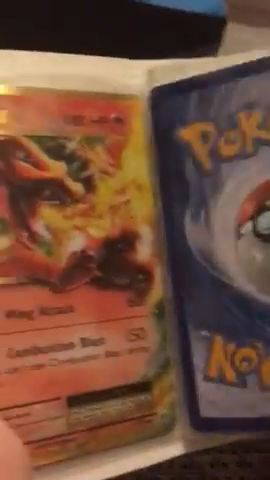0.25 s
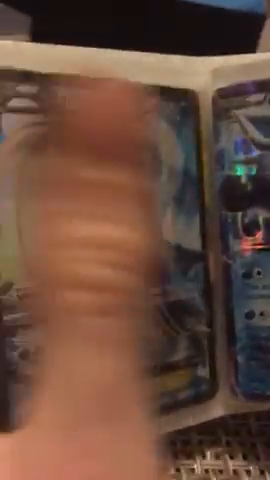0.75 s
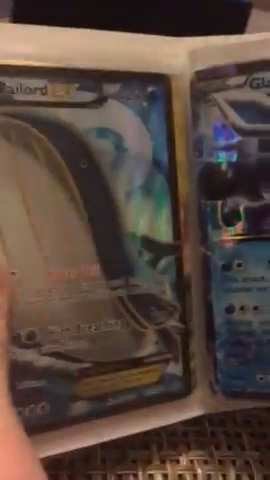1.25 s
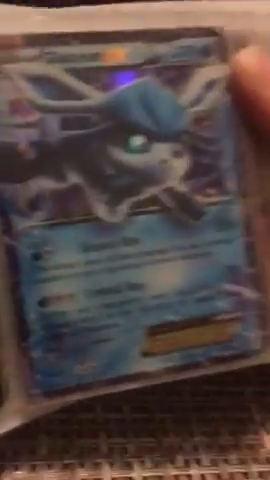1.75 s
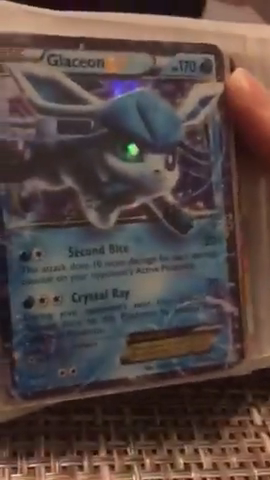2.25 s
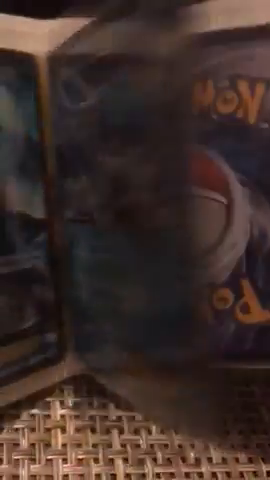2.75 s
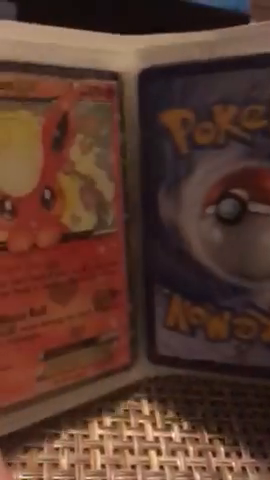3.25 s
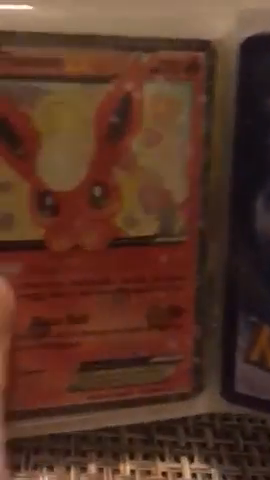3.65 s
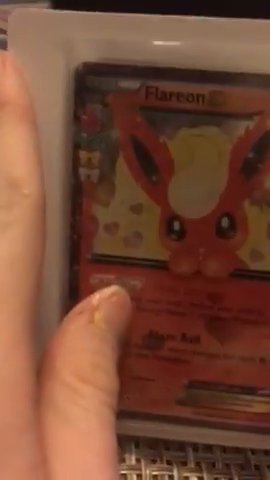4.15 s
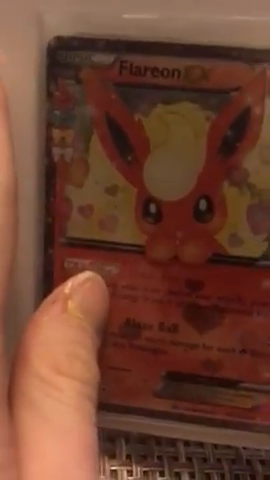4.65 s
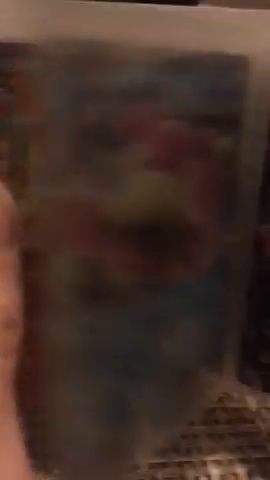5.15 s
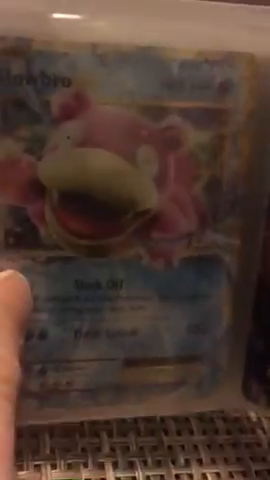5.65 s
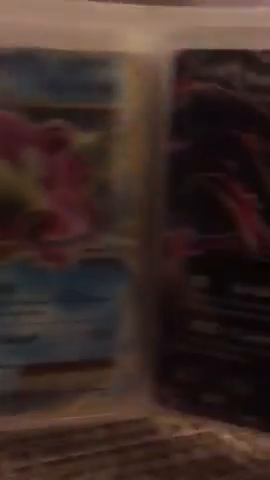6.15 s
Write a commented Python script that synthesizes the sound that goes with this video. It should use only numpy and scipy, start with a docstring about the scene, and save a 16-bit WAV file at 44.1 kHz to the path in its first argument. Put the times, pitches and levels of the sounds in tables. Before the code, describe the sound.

Sparse film clicks, grainy slides and soft swishes from stiff pocket pages being flipped in a quiet room, above a deep unsteady hum.

```python
"""In a quiet room, close by, plastic pocket pages full of trading cards are turned by hand in a binder.
Sleeves snap as they unstick: bursts of tiny slips set the film and the page ringing.
Pages slide, scuff and swish as shaped grainy noise; edges knock on the binder and ring its dull modes.
Under it a motor hums in steady tones, the hand-held microphone rumbles and deep booms swell briefly."""
import sys
import numpy as np
from scipy import signal
from scipy.fft import rfft, irfft, next_fast_len
from scipy.io import wavfile
from scipy.ndimage import map_coordinates

SR = 44100
rng = np.random.default_rng(int(sys.argv[2]) if len(sys.argv) > 2 else 0)


def to_wav(s):
    """Save 16-bit WAV."""
    ch = np.atleast_2d(s).T  # columns
    pcm = np.round(np.clip(ch, -1, 1) * 32767)  # PCM
    wavfile.write(sys.argv[1], SR, pcm.astype(np.int16))


N = 282769
TIME = np.arange(N) / SR   # s
CUTOFF_HZ = 17700

# A sleeve lets go: t/s, level/dB (rms over 5 ms), build-up/ms (0.05 or more is used), brightest f/Hz,
# width of the bright range/octaves, page body against film/dB, page body f/Hz
SNAPS = [(.0145, -69, .1, 9500, 1, -10, 1600), (0.2723, -57, .6, 6000, 1, -10, 1600),
         (0.2816, -32.5, 0.54, 6500, 0.81, -5.5, 1400), (.297, -63, .5, 7000, 1.3, -10, 1600),
         (.335, -68, .3, 9000, 1, -10, 1600), (0.556, -56, .3, 9520, 1.5, -9, 1600),
         (.567, -57, .5, 5000, 0.99, 13, 1800), (.593, -65, .1, 12500, 1, -10, 1600),
         (1.0482, -53, 0.09, 6000, 4.2, 10, 2300), (1.049, -52, .4, 4470, 1.2, 4, 2200),
         (1.505, -70, .3, 5500, 0.92, -2, 1800), (1.7586, -61, 0.26, 4480, 0.6, -2, 1600),
         (1.7945, -63, .17, 4470, 0.54, -4, 1600), (1.824, -70, .3, 5000, 1.3, 3, 1500),
         (1.851, -67, .2, 5500, 1.3, 2, 1600), (1.888, -59.5, .1, 4600, 1.2, 0, 1600),
         (1.93, -68, .2, 8000, 1, -5, 1600), (1.949, -62.5, .4, 7500, 0.93, 8, 1600),
         (2.178, -66.5, .46, 7000, 1.4, -5, 1600), (2.333, -68, .5, 8000, 0.9, -5, 1600),
         (2.4149, -46, .76, 10100, 1.2, -16, 2000), (2.419, -39.5, 2.3, 5400, 1.2, -10, 2200),
         (2.7051, -42.5, 0.061, 5770, 1.72, 12.5, 1400), (2.7233, -36.5, 0.031, 4630, 0.84, 1, 1570),
         (2.78, -69, .1, 11000, 1, -10, 1600), (2.868, -67, .1, 11500, 1, -10, 1600),
         (3.006, -56.5, 0.56, 5500, 1.1, 14, 1600), (3.242, -58.5, 0.27, 5240, 2, 8, 1800),
         (3.44, -66, .5, 8500, 1.14, -6, 1600), (4.0818, -60, 0.092, 3500, 0.6, 8, 1890),
         (4.8765, -49, 1.9, 9000, 1.1, -9, 2180), (4.8790, -34, 0.89, 8500, 1.15, -2, 2400),
         (4.886, -51.5, .2, 7900, 0.98, -7, 2000), (5.035, -71, 0.11, 12400, 1, -10, 1600),
         (5.048, -65, .1, 13000, 1, -10, 1600), (5.0529, -51.5, .1, 5230, 1.1, 3, 1600),
         (5.0605, -54, 0.18, 3800, 0.99, 22, 1500), (5.065, -64, 0.26, 4500, 1, 5, 1600),
         (5.084, -51, .12, 9000, 2.5, 8, 1400), (5.2905, -48.5, 0.11, 5896, 0.76, 1.5, 1500),
         (5.296, -53, .3, 5560, 2.5, 5, 1400), (5.302, -56, 0.24, 6000, 1.6, 4, 1600),
         (5.322, -66, .2, 8500, 1.3, -6, 1600), (5.488, -62, .4, 8500, 1.5, -3, 2200),
         (5.493, -55, .8, 4370, 1.2, -7, 2200), (5.874, -58.5, 0.4, 6000, 1.1, 5, 1800),
         (6.1489, -54, 0.13, 5510, 2.1, 12, 2100)]
# Card edges and fingers knock on the binder: t/s, level/dB (rms over 5 ms), strongest f/Hz
KNOCKS = [(1.7597, -54.5, 800), (1.7943, -53, 750), (1.888, -50, 900), (2.652, -40.5, 750),
          (2.725, -50.5, 600), (2.9852, -47, 700), (2.993, -47, 550), (2.9976, -58, 650),
          (5.0590, -55, 800)]
# A page slides: start t/s, length/s, drag level/dB and film hiss level/dB (each before its trim in slides()),
# gain from start to end/dB
SLIDES = [(0.459, 0.24, -68.5, -72.5, -7), (1.084, 0.21, -76, -71.5, -3), (1.263, 0.23, -91, -80, -6),
          (1.58, 0.14, -93, -62, -2), (1.729, 0.4, -72, -72, -12), (2.722, 0.19, -60.5, -66.5, 13),
          (2.966, 0.077, -70, -60, -4), (3.448, 0.11, -64.5, -66.5, 2.5), (3.572, 0.19, -65.5, -68, 3),
          (3.782, 0.095, -63.5, -63, 7), (3.868, 0.18, -78, -63.5, -1), (4.876, 0.36, -82, -73.5, -7)]


def from_db(db):
    """Decibels to gain."""
    return 10 ** (np.asarray(db) / 20)


def rms_one(x):
    """Scale to rms 1."""
    return x / np.sqrt(np.mean(x ** 2) + 1e-20)


def in_time(rows):
    """Read each column of a curve at every sample; the first column is the time."""
    s, *columns = np.transpose(rows)
    return [np.interp(TIME, s, column) for column in columns]


def drift(rate):
    """Slow random wandering with rms 1; it takes a new direction `rate` times per second."""
    knots = rng.standard_normal(int(TIME[-1] * rate) + 2)
    return rms_one(np.interp(TIME * rate, np.arange(len(knots)), knots))


def tone(hz, wander=0):
    """A steady sine of rms 1 with a random start; `wander` shifts its phase (radians)."""
    return np.sqrt(2) * np.sin(2 * np.pi * (hz * TIME + rng.random()) + wander)


def bell_db(hz, centre_hz, slope_db):
    """Loss away from a centre, growing with the square of the distance in octaves."""
    return -slope_db * np.log2(hz / centre_hz) ** 2


def coloured(x, spectrum):
    """Filter a signal through a curve of (f/Hz, dB) points, falling off below the first; rms 1."""
    hz, db = np.transpose(spectrum)
    size = next_fast_len(len(x))
    bins = np.maximum(np.fft.rfftfreq(size, 1 / SR), 1)
    below = np.minimum(bins / hz[0], 1) ** 2
    gain = from_db(np.interp(np.log(bins), np.log(hz), db))
    return rms_one(irfft(rfft(x, size) * below * gain, size)[:len(x)])


def friction(length, per_s, spread_db, smooth):
    """Tiny slips of uneven size over a smooth rub; rms 1."""
    sizes = from_db(spread_db * np.minimum(rng.exponential(1, length), 4))
    sizes = sizes * rng.choice([-1, 1], length)
    slips = sizes * (rng.random(length) < per_s / SR)
    return rms_one(rms_one(slips) + smooth * rng.standard_normal(length))


def ring(force, hz, t60):
    """A force sets one resonance ringing; it falls by 60 dB in t60 seconds."""
    r = from_db(-60 / (t60 * SR))
    w = 2 * np.pi * min(hz, .45 * SR) / SR
    return signal.lfilter([.5, 0, -.5], [1, -2 * r * np.cos(w), r * r], force + 1e-18)


def at_level(hit, db):
    """Scale a hit so that its energy equals db rms held for 5 ms."""
    return from_db(db) * hit / np.sqrt(np.sum(hit ** 2) / (.005 * SR))


def stroke(t, length_s, attack, release):
    """A rub sets in at t = 0, holds and lets go; longer rubs have softer edges."""
    onset = 1 + np.tanh(t / (attack * length_s))
    letting_go = 1 - np.tanh((t - length_s) / (release * length_s))
    return onset * letting_go / 4


def flexing(x, depth_db, rate, per_octave=11):
    """A bending page shifts its resonances: narrow bands rise and sink on their own; rms 1."""
    hz, s, frames = signal.stft(x, SR, nperseg=512)
    band, moment = np.meshgrid(per_octave * np.log2(1 + hz / 500), rate * s, indexing="ij")
    knots = rng.standard_normal((int(band.max()) + 2, int(moment.max()) + 2))
    patches = rms_one(map_coordinates(knots, [band, moment], order=1))
    return rms_one(signal.istft(frames * from_db(depth_db * patches), SR)[1][:N])


def add(out, s, sound):
    """Mix a sound in from time s on."""
    start = max(round(s * SR), 0)
    out[start:start + len(sound)] += sound[:max(N - start, 0)]


def motor(shaft_hz=29.26, waver_db=1.02, wander=0.26):
    """Multiples of the shaft rate and fainter room tones, each wavering a little in level and phase."""
    # Lines of the motor: multiple of the shaft rate, level/dB
    shaft_lines = [(1, -72.5), (3, -51), (4, -51), (5, -49.5)]
    # Fainter tones in the room: f/Hz, level/dB
    room_tones = [(120, -53), (153, -56.5), (212, -63.5), (229, -62), (307, -75), (343, -70.5), (473, -77)]
    lines = [(multiple * shaft_hz, db) for multiple, db in shaft_lines] + list(room_tones)
    out = np.zeros(N)
    for hz, db in lines:
        out += from_db(db + waver_db * drift(6)) * tone(hz, wander * drift(2.5))
    return out


def deep_hum(waver_db=1.5, wander=0.18):
    """The lowest hum swells and sinks several times while its pitch drifts by a few Hz."""
    # Path of the hum: t/s, level/dB, f/Hz
    hum_path = [(0, -41.5, 59.5), (1.5, -44, 58.7), (2.9, -41.5, 60), (3.4, -45, 59.6), (3.72, -35, 61),
                (3.88, -39, 61.86), (4.1, -35, 62.27), (4.29, -27.5, 61.6), (4.55, -44.5, 60.8),
                (4.8, -45.5, 59), (5.2, -46, 57.8), (5.48, -36.5, 58.24), (5.9, -40.5, 59.1),
                (6.12, -49, 58.6), (6.3, -34, 57.5), (6.41, -44.5, 57.85)]
    db, hz = in_time(hum_path)
    phase = 2 * np.pi * np.cumsum(hz) / SR + wander * drift(3.86)
    return np.sqrt(2) * from_db(db + waver_db * drift(8)) * np.sin(phase)


def brief_hum(hz=478, db=-66, end_s=0.25, fade_s=.04, wander=.8):
    """A faint, higher hum with an unsteady phase that soon dies away."""
    fading = (1 - np.tanh((TIME - end_s) / fade_s)) / 2
    phase = 2 * np.pi * hz * TIME + wander * drift(11)
    return from_db(db) * fading * np.sqrt(2) * np.sin(phase)


def rumble(wander=0.48):
    """Broad low noise, with narrow booms that swell out of it."""
    # Loudness of the broad noise: t/s, level/dB
    noise_level = [(0, -46.5), (.9, -43.5), (1.45, -47), (2.2, -44), (3.3, -44.5), (3.8, -44.5), (5, -44),
                   (6.41, -44.5)]
    # Its colour: f/Hz, relative level/dB
    noise_colour = [(20, -12), (35, -16), (50, 0.5), (90, 1.5), (125, -3.5), (160, 1), (220, -6),
                    (270, -12.5), (330, -15.5), (420, -29), (700, -69.5)]
    # Deep booms: t/s at the top, level/dB at the top, half-width/s, f/Hz
    booms = [(3.72, -41.5, 0.082, 88.1), (4.3, -37, 0.042, 94.3), (4.85, -42, 0.2, 110.4),
             (5.15, -43, 0.0748, 95.2)]
    noise_db, = in_time(noise_level)
    out = from_db(noise_db) * coloured(rng.standard_normal(N), noise_colour)
    for s, db, width_s, hz in booms:
        swell = np.exp(-((TIME - s) / width_s) ** 2 / 2)
        out += from_db(db) * swell * tone(hz, wander * drift(5.2))
    return out


def handling():
    """The hand-held microphone rumbles as it is moved: low noise with a changing level."""
    # Loudness: t/s, level/dB
    handling_level = [(0, -48), (3.3, -48.5), (3.7, -42.5), (4.3, -48.5), (4.55, -48.5), (5.1, -44.5),
                      (5.6, -49.5), (6.41, -49.5)]
    # Colour: f/Hz, relative level/dB
    handling_colour = [(25, -5), (50, 11.5), (105, 10), (150, -10.5), (300, -43.5)]
    handling_db, = in_time(handling_level)
    return from_db(handling_db) * coloured(rng.standard_normal(N), handling_colour)


def room_hiss(db=-64.5):
    """The quiet room's hiss is steady noise that is weaker towards the treble."""
    # Colour: f/Hz, relative level/dB
    air_colour = [(350, -1), (500, -1.5), (760, -2.5), (880, -7.5), (1000, -7), (1200, -10.3),
                  (1480, -10.5), (1600, -6.5), (1720, -10.5), (2000, -15), (2750, -22.5), (3500, -20),
                  (5000, -26), (6000, -25), (9000, -28.5), (10300, -34), (17000, -59)]
    return from_db(db) * coloured(rng.standard_normal(N), air_colour)


def crinkles(per_s=22, reach_s=0.048, db=-72.5, spread_db=2.5):
    """Rows for faint snaps at random while a page slides, and just before and after."""
    build_ms, bright_hz, octaves, body_db, body_hz = 0.87, 7000, 1.8, 1, 1700
    rows = []
    for start_s, length_s, *_ in SLIDES:
        times = start_s - reach_s + np.cumsum(rng.exponential(1 / per_s, 20))
        sizes, colours = rng.normal(size=20), rng.normal(size=20)
        for s, size, colour in zip(times, sizes, colours):
            if s < start_s + length_s + reach_s:
                rows.append((s, db + spread_db * size, build_ms, bright_hz * 2 ** (0.34 * colour),
                             octaves, body_db, body_hz))
    return rows


def snaps(focus_db=17.0, body_focus_db=9, rattle=0.14, rattle_s=0.0016, stiff_hz=3100,
          body_top_hz=2350, top_share=0.51, bounce=0.16):
    """Stuck film peels in a swelling run of slips, lets go, and the card rattles briefly in its pocket.
    A reflection off the facing page, at a new distance each time, cuts the sound into uneven bands."""
    # Ringing of a filled sleeve: f/Hz, energy level/dB, t60/s; the three lowest belong to the page body
    sleeve_modes = [(1230, -2, 0.0073), (1500, -6.5, 0.0027), (2220, 5.5, 0.0045), (3410, 9, 0.0049),
                    (4200, 9, 0.0013), (5400, 7, 0.0015), (6210, 6, 0.0027), (7850, 14.5, 0.0015),
                    (9700, 8.5, 0.0019), (11500, 13.5, 0.0008), (13000, 7, 0.0015), (15700, 12, .0018)]
    out, lead, peel = np.zeros(N), .015, .8
    t = np.arange(-round(lead * SR), 2 * round(lead * SR)) / SR
    # a patch of film radiates no lows; the whole page is too heavy for highs
    small_area = signal.butter(8, stiff_hz, "high", fs=SR, output="sos")
    large_area = signal.butter(8, body_top_hz, fs=SR, output="sos")
    for s, db, build_ms, bright_hz, octaves, body_db, body_hz in list(SNAPS) + crinkles():
        peeling = peel * np.exp(-abs(t) * 1000 / max(build_ms, .05))
        rattling = rattle * np.exp(-abs(t) / rattle_s)
        swell = np.where(t < 0, peeling, rattling)
        release_click = 1.4 * (t == 0)
        force = swell * friction(len(t), per_s=9000, spread_db=3, smooth=.5) + release_click
        force = force + bounce * np.roll(force, round(rng.uniform(.0005, .0012) * SR))
        body, film = np.zeros(len(t)), np.zeros(len(t))
        for hz, mode_db, t60 in sleeve_modes[:3]:
            level_db = mode_db + body_db + bell_db(hz, body_hz, body_focus_db)
            body += at_level(ring(force, hz, t60), level_db)
        for hz, mode_db, t60 in sleeve_modes[3:]:
            level_db = mode_db + bell_db(hz, bright_hz, focus_db / octaves ** 2)
            film += at_level(ring(force, hz, t60), level_db)
        top_hz = min(bright_hz * 2 ** (top_share * octaves), CUTOFF_HZ)
        softness = signal.butter(2, top_hz, fs=SR, output="sos")
        film = signal.sosfilt(softness, signal.sosfilt(small_area, film))
        add(out, s - lead, at_level(signal.sosfilt(large_area, body) + film, db))
    return out


def scuffs(focus_db=3.5, usual_attack=0.39, release=0.55):
    """Quick grainy rubs of film on film, some bright, some dull; short ones join each knock and
    lead into each listed snap. Attack and release are shares of the length."""
    # Short scuffs: start t/s, length/s, level/dB, brightest f/Hz, attack as a share of the length
    scuff_rows = [(.555, 0.037, -60.5, 8440, .16), (.61, .05, -71, 11000, .2),
                  (.655, 0.043, -64.5, 11000, .25), (.685, 0.023, -67, 10000, .3),
                  (1.050, 0.026, -59, 7500, .1), (1.345, 0.013, -66, 7000, .3),
                  (1.376, .012, -68, 7000, 0.27), (1.413, 0.012, -69, 7500, .3),
                  (1.504, 0.016, -66, 6000, .2), (1.988, 0.018, -55.5, 7440, 0.23),
                  (2.236, 0.019, -59.5, 5770, 0.22), (2.406, 0.026, -57.5, 10000, 0.33),
                  (2.615, 0.035, -60.5, 6400, 0.27), (2.708, 0.026, -53, 8000, 0.12),
                  (2.724, 0.046, -56.5, 5200, 0.087), (2.85, 0.052, -61, 4400, 0.47),
                  (3.180, 0.012, -63.5, 6340, .2), (3.24, 0.031, -59, 6840, .05),
                  (3.391, 0.019, -64.5, 7460, 0.09), (3.44, .015, -61, 9000, 0.12),
                  (3.514, .016, -64, 4500, 0.16), (3.603, 0.012, -71, 8000, .15),
                  (4.864, 0.019, -59, 10000, 0.35), (5.057, 0.012, -50.5, 5000, 0.092),
                  (5.1, 0.027, -56, 9100, 0.6), (5.152, 0.01, -59, 7000, .2),
                  (5.225, 0.068, -60.5, 10900, 0.29), (5.291, 0.014, -50.5, 5940, 0.095),
                  (5.488, 0.016, -52, 9900, 0.077), (5.52, 0.063, -65, 13990, 0.29),
                  (5.568, 0.048, -54.5, 11500, 0.16), (5.86, 0.035, -68, 7000, .2),
                  (5.932, 0.018, -66.5, 7000, .2)]
    # Colour of film rubbing on film: f/Hz, relative level/dB
    film_colour = [(500, 2), (1400, 14), (2000, 2.5), (2700, 0.5), (3800, 0), (4800, -5), (5900, -5),
                   (7000, -5.5), (8400, -6), (10300, -8.5), (12200, -7), (17000, -8.5)]
    out, lead = np.zeros(N), .12
    t = np.arange(-round(lead * SR), round(lead * SR)) / SR
    grazes = [(s, 0.0046, -55.5, 3580, usual_attack) for s, *_ in KNOCKS]
    peels = []
    for s, db, build_ms, bright_hz, *_ in SNAPS:
        peel_s = 3.9 * max(build_ms, .05) / 1000   # a multiple of the snap's build-up
        peels.append((s - peel_s, peel_s, db - 12.5, bright_hz, usual_attack))
    for s, length_s, db, bright_hz, attack in list(scuff_rows) + grazes + peels:
        colour = [(hz, film_db + bell_db(hz, bright_hz, focus_db)) for hz, film_db in film_colour]
        rub = coloured(friction(len(t), per_s=2200, spread_db=3.0, smooth=0.61), colour)
        add(out, s - lead, from_db(db) * stroke(t, length_s, attack, release) * rub)
    return np.std(out) * flexing(out, depth_db=2.0, rate=27)


def slides(attack=0.11, release=0.24, drag_trim_db=2, hiss_trim_db=-4):
    """Pages slide: a grainy drag where the cards press, a fine hiss where film only touches."""
    # Colour of the drag: f/Hz, relative level/dB
    drag_colour = [(350, -8), (700, 7), (1350, 7), (2000, 4.5), (2700, -3.5), (3900, -1.5), (4900, -8),
                   (6000, -8.5), (9000, -33), (16000, -52)]
    # Colour of the film hiss: f/Hz, relative level/dB
    hiss_colour = [(2500, -8), (4800, -6.5), (6000, -7), (7000, -5.5), (8800, -4.5), (10300, -9),
                   (12000, -12.5), (17000, -28)]
    drag, hiss = np.zeros(N), np.zeros(N)
    for s, length_s, drag_db, hiss_db, gained_db in SLIDES:
        progress = np.clip((TIME - s) / length_s, 0, 1)
        effort = stroke(TIME - s, length_s, attack, release) * from_db(gained_db * (progress - .5))
        drag += from_db(drag_db) * effort
        hiss += from_db(hiss_db) * effort
    heavy = friction(N, per_s=900, spread_db=1.0, smooth=0.87) * from_db(2.0 * drift(70))
    light = friction(N, per_s=1500, spread_db=0.0, smooth=0.78) * from_db(1.1 * drift(90))
    heavy = flexing(coloured(heavy, drag_colour), depth_db=2.4, rate=18)
    light = flexing(coloured(light, hiss_colour), depth_db=1.8, rate=12)
    return from_db(drag_trim_db) * drag * heavy + from_db(hiss_trim_db) * hiss * light


def swishes(width_share=0.097, grain_db=0.5, waver_octaves=.04, attack=0.25, release=0.085):
    """Grainy rubbing rings one resonance of the bent page, which glides and wavers as the bend changes."""
    # Swishes: start t/s, length/s, level/dB, f/Hz at the start, f/Hz at the end
    swish_rows = [(.468, 0.029, -67, 1910, 1700), (0.471, 0.1, -76.5, 3630, 4200),
                  (1.584, 0.15, -70, 7040, 6600), (1.586, 0.13, -71, 12000, 13000),
                  (2.727, 0.2, -63.5, 4300, 3900), (2.729, 0.2, -69, 1160, 1250),
                  (2.844, 0.067, -66, 5900, 7000), (3.47, 0.1, -71, 2100, 1890),
                  (3.462, 0.16, -78, 8600, 9600), (3.53, .06, -74, 5500, 6200),
                  (3.62, 0.063, -69, 1930, 1700), (3.681, 0.3, -71, 6000, 7000),
                  (3.765, 0.16, -66, 8300, 9000), (3.804, .07, -71, 1300, 1640),
                  (3.86, 0.088, -66, 9900, 11000), (3.828, 0.11, -71, 15070, 16000),
                  (5.109, 0.018, -60.5, 5600, 5450), (5.488, 0.013, -68, 13000, 13200),
                  (5.518, .05, -70, 14500, 16200), (5.569, 0.058, -60.5, 5670, 6200),
                  (5.65, 0.035, -72.5, 6740, 6950)]
    out, lead = np.zeros(N), .1
    t = np.arange(-round(lead * SR), 4 * round(lead * SR)) / SR
    for s, length_s, db, start_hz, end_hz in swish_rows:
        glide_hz = np.interp(t, [0, length_s], [start_hz, end_hz])
        hz = glide_hz * 2 ** (waver_octaves * drift(28)[:len(t)])
        # turn the moving resonance down to 0 Hz, let it ring there, then turn it back up
        turning = np.exp(2j * np.pi * np.cumsum(hz) / SR)
        r = np.exp(-2 * np.pi * width_share * start_hz / SR)
        slips = friction(len(t), per_s=1300, spread_db=grain_db, smooth=0.28)
        rung = np.real(turning * signal.lfilter([1], [1, -2 * r, r * r], slips / turning))
        add(out, s - lead, from_db(db) * stroke(t, length_s, attack, release) * rms_one(rung))
    return out


def knocks(focus_db=2.5, chatter=.025, chatter_s=.005):
    """A blow and a little chatter ring the binder's modes; where it lands decides which ring most."""
    # Dull modes of the binder: f/Hz, level/dB, t60/s
    binder_modes = [(330, -4, 0.027), (556.3, 1, 0.013), (700, 3, 0.017), (840, 0, 0.015),
                    (1083, -3, 0.017), (1500, -5, 0.0086), (1790, -13, 0.032), (2000, -9.5, 0.028),
                    (3600, -12, .008), (6000, 1, .003)]
    out, t = np.zeros(N), TIME[:SR // 10]
    for s, db, centre_hz in KNOCKS:
        grains = friction(len(t), per_s=2000, spread_db=2, smooth=.3)
        force = (t == 0) + chatter * np.exp(-t / chatter_s) * grains
        hit = np.zeros(len(t))
        for k, (hz, mode_db, t60) in enumerate(binder_modes):
            level_db = mode_db + bell_db(hz, centre_hz, focus_db) + rng.normal(0, 0.6)
            hit += (-1) ** k * from_db(level_db) * ring(force, hz, t60)   # neighbours push opposite ways
        add(out, s, at_level(hit, db))
    return out


def room(x, wall_hz=9000, first_s=0.009, t60_s=.18, db=-31):
    """A faint, short, dulled tail from a furnished room: the sound smeared by fading noise."""
    t = TIME[:SR // 2]
    tail = rng.standard_normal(len(t)) * from_db(-60 * t / t60_s) * (t > first_s)
    tail = signal.sosfilt(signal.butter(1, wall_hz, fs=SR, output="sos"), tail)
    return from_db(db) * signal.fftconvolve(x, tail / np.sqrt(np.sum(tail ** 2)))[:N]


def scene():
    """The binder close by, with hum, rumble and hiss behind it."""
    background = motor() + deep_hum() + brief_hum() + rumble() + handling() + room_hiss()
    binder = snaps() + scuffs() + slides() + swishes() + knocks()
    return (binder + room(binder) + background)[None]


def record(dry):
    """The microphone has a few narrow dips in the treble; the top is cut steeply."""
    # Dips in the response: f/Hz, width/Hz, depth (0 to 1)
    mic_dips = [(4860, 200, 0.3), (7700, 530, 0.38), (10420, 490, 0.37)]
    for hz, width_hz, depth in mic_dips:
        dry = dry - depth * signal.lfilter(*signal.iirpeak(hz, hz / width_hz, fs=SR), dry)
    return signal.sosfilt(signal.ellip(10, .1, 70, CUTOFF_HZ, fs=SR, output="sos"), dry)


dry = scene()
out = record(dry)
to_wav(out)
```